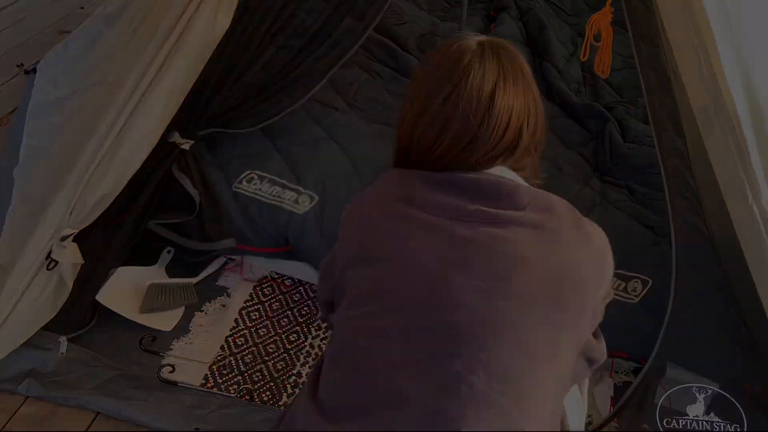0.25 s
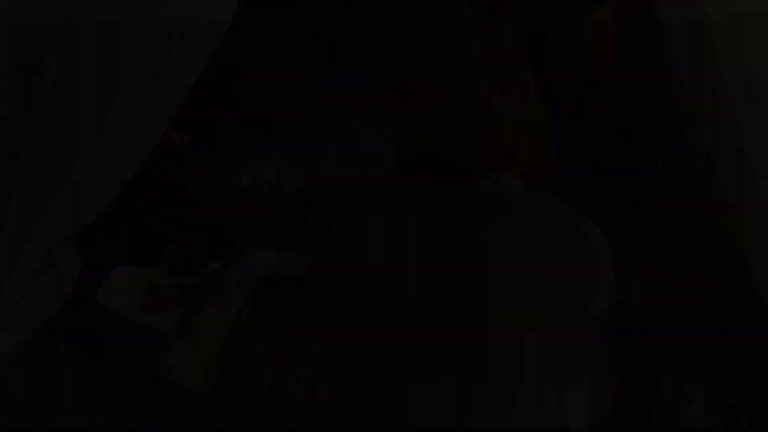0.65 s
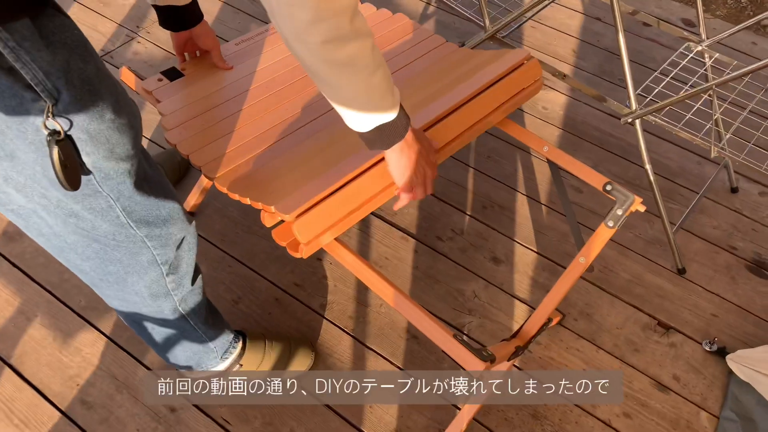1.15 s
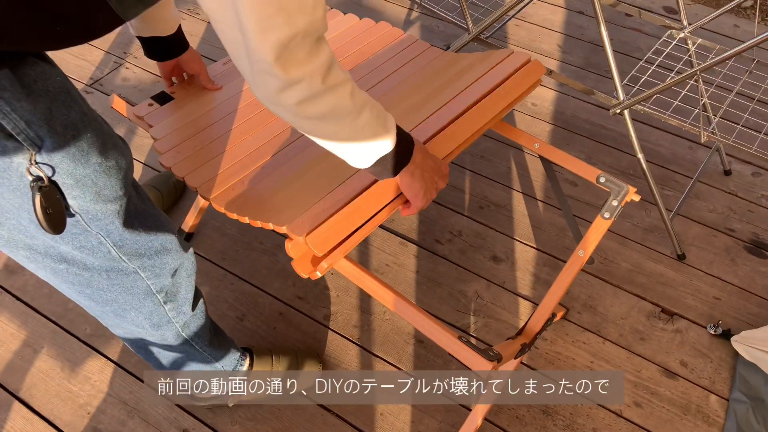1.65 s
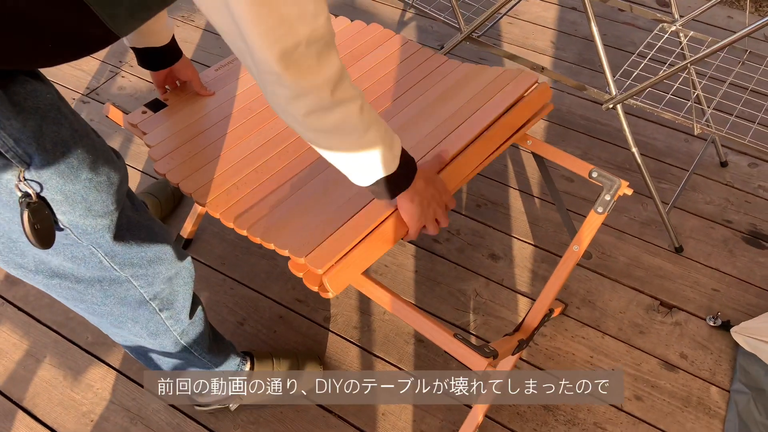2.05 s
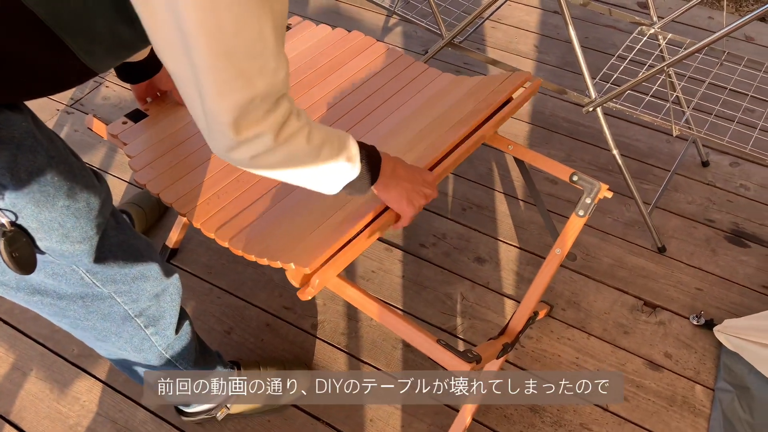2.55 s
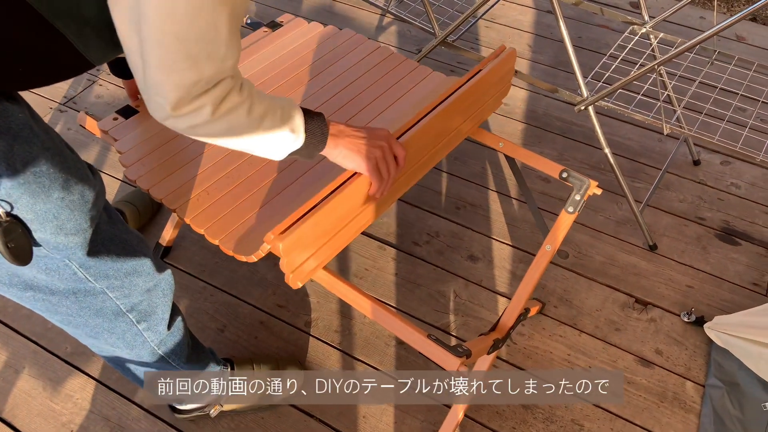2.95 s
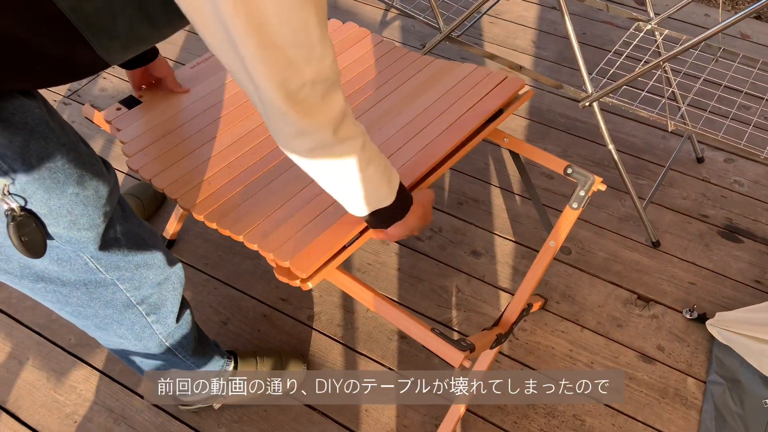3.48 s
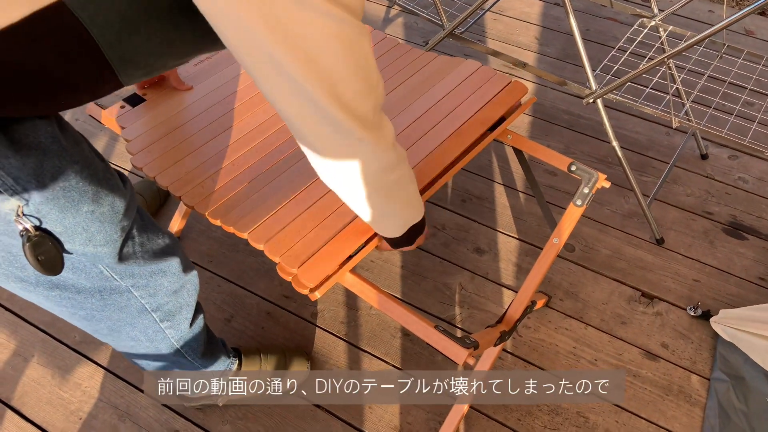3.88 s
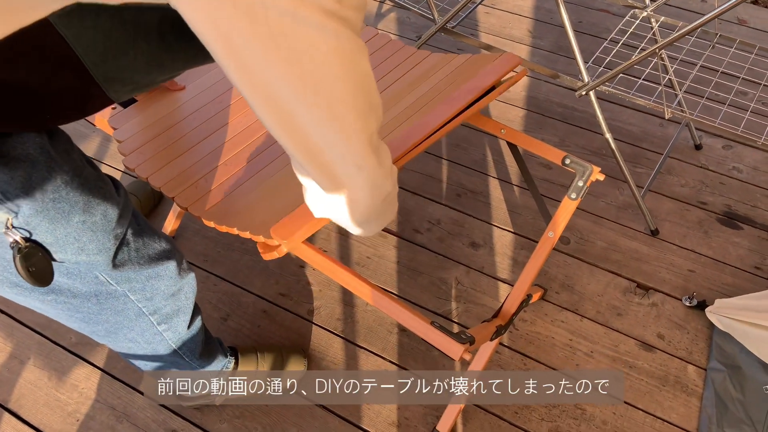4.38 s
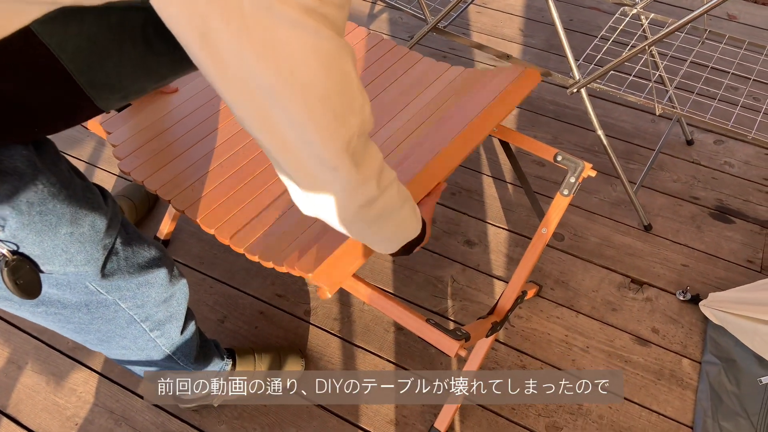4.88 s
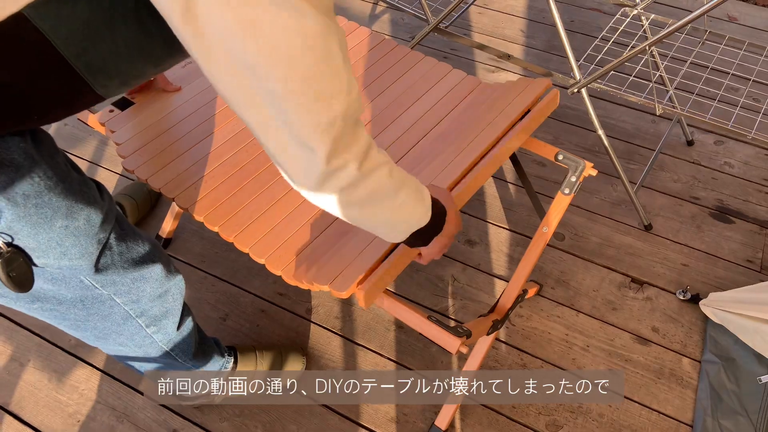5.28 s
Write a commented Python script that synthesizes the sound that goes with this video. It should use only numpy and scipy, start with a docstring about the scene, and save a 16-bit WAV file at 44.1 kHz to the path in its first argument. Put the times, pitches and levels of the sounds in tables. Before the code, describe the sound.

Very quiet cloth rustle and soft pats in a tent fade away within the first second. Abruptly the open deck begins with a bright wooden clack. Slats then scrape, rattle and knock in irregular bursts, with hand swishes between them and a tiny creak before three seconds. The loudest, brightest crack comes near five seconds. Close stereo microphone, dry outdoors, low wind buffeting.

```python
"""The slatted top of a wooden camp table is unrolled over its frame on an open deck. Slats clack as decaying
modes under a noise crack; sliding wood is friction noise and ringing jolts, with swishes, knocks and a creak.
A light breeze buffets the microphone: filtered noise swelling in gusts, and short pushes of pressure.
Before that, bedding rustles faintly in a tent and fades away: friction noise, soft pats and still air."""
import sys
import numpy as np
from scipy import signal
from scipy.fft import rfft, irfft, next_fast_len
from scipy.io import wavfile

SR = 44100
rng = np.random.default_rng(int(sys.argv[2]) if len(sys.argv) > 2 else 0)


def put_to_file(sound):
    """Save the sound as 16-bit audio at rate SR, in the file named by the first command-line argument."""
    columns = np.atleast_2d(sound).T  # one column per channel
    safe = np.clip(columns, -1, 1)
    whole_steps = np.round(safe * 32767)
    wavfile.write(sys.argv[1], SR, whole_steps.astype(np.int16))


N = 243873
TIME = np.arange(N) / SR
HIT = np.arange(SR // 4) / SR  # time within one short sound [s]

# short wooden bursts: the first row is the scene change, a burst as the deck sound begins; the rest are slat blows
# (time [s], relative level [dB], relative hardness of the contact [dB], own note [Hz])
WOOD_BURSTS = [(0.887, -44.5, -13.5, 1397), (0.917, -43.5, -13, 1300), (0.9391, -25.5, -17, 1360),
               (0.945, -28, -13, 1257), (0.9597, -26, -23, 1174), (0.978, -12.5, -5.5, 1265),
               (0.981, -23, -11, 3075), (1.0348, -34, -14, 2450), (1.4209, -53.5, -15.5, 1260),
               (1.7506, -21.5, -7, 1295), (1.7639, -27, -13, 1485), (1.798, -27, -19.5, 1300),
               (1.8572, -38.5, -28.5, 1440), (2.114, -51.5, -49.5, 1750), (2.2579, -48.5, -54.5, 1317),
               (2.316, -44, -56, 1454), (2.538, -51, -36.5, 1090), (2.636, -58, -21, 1274),
               (2.755, -43, -30, 1795), (2.7904, -28.5, -14, 1440), (2.8595, -40.5, -13, 890),
               (2.9047, -23.5, -8, 973), (2.9125, -22.5, -19.5, 3407), (3.189, -46, -33.5, 823),
               (3.233, -40.5, -20.5, 1124), (3.3238, -44.5, -48, 1950), (3.565, -51.5, -33, 858),
               (3.8058, -38.5, -32.5, 908), (3.9434, -41, -28, 1687), (4.043, -52.5, -44, 1407),
               (4.165, -41, -9, 1288), (4.2173, -36, -17, 895), (4.2362, -22.5, -24, 2322),
               (4.485, -46.5, -38.5, 1300), (4.5469, -33, -24.5, 1415), (4.559, -28.5, -24, 1282),
               (4.766, -35, -20.5, 2384), (4.802, -19, -0.5, 2290), (4.8143, -27, -4, 2300),
               (4.8695, -33, -24, 2145), (4.8966, -12.5, 7.5, 5640), (4.9338, -29.5, -15, 1685),
               (4.976, -35.5, -9.5, 874), (5.0128, -25, -7.5, 1760), (5.03, -23.5, -18, 2065),
               (5.4272, -33, -23, 1248), (5.437, -27.5, -18.5, 963), (5.4905, -35, -23, 1360)]
# what the slats and rails ring with: (frequency [Hz], relative level [dB])
WOOD_MODES = [(660, -3.5), (860, 1.5), (1040, -5.5), (1310, 3.5), (1450, 1.5), (1680, -2.5), (2335, 6),
              (2500, 1), (2790, -2), (3090, -1), (3480, -3), (3895, 2.5), (4420, 2.5), (4690, -2),
              (5565, -3), (5765, 0), (6480, 8), (6600, 3.5), (7450, 4)]
# colour of scraping friction: (frequency [Hz], gain [dB])
SCRAPE_COLOUR = [(300, -4.5), (1500, 4), (2500, -2.5), (4200, -4), (7000, -14.5), (8600, -26), (11000, -15),
                 (16000, -44.5)]
MIDDLING_HARD_DB = -18.5  # hardness of a middling blow
DRAG_T60_S = 0.036  # ring of the hand-damped top


def undb(db):
    """Decibels to gain."""
    return 10 ** (np.asarray(db) / 20)


def curve(rows, axis):
    """One column of a control table, at every sample."""
    rows = np.asarray(rows)
    return np.interp(TIME, rows[:, 0], rows[:, axis])


def unit(x):
    """Scale to rms 1."""
    return x / np.sqrt(np.mean(x ** 2))


def attack_rms(x, size=660):
    """Strength of the first moments of a blow."""
    return np.sqrt(np.mean(x[..., :size] ** 2))


def fade(t60):
    """Exponential ring-down that loses 60 dB in t60 seconds."""
    return np.exp(-np.log(1000) * HIT / np.maximum(t60, 1e-3))


def swell(s, db, length_s):
    """Power of a bell-shaped rise and fall around time s."""
    return undb(db) ** 2 * np.exp(-(2 * (TIME - s) / length_s) ** 2)


def colour(x, points):
    """Causal minimum-phase filter whose gain follows (Hz, dB) points."""
    size = 2 * next_fast_len(x.shape[-1])
    hz, db = np.transpose(points)
    freq = np.maximum(np.fft.rfftfreq(size, 1 / SR), 1)
    gain_db = np.interp(np.log(freq), np.log(hz), db)
    # folding the cepstrum onto positive time makes the filter causal
    cepstrum = irfft(np.log(undb(gain_db)))
    cepstrum[1:size // 2] *= 2
    cepstrum[size // 2 + 1:] = 0
    response = np.exp(rfft(cepstrum))
    return irfft(rfft(x, size) * response)[..., :x.shape[-1]]


def band(x, lo_hz, hi_hz):
    """Band-pass filter."""
    edges = [lo_hz, min(hi_hz, SR / 2 - 1)]
    return signal.sosfilt(signal.butter(3, edges, "band", fs=SR, output="sos"), x)


def stereo(pair, side_db):
    """Left and right from a middle signal and a side signal."""
    return pair[0] + undb(side_db) * pair[1] * np.array([[1], [-1]])


def noise(points, side_db):
    """Steady coloured stereo noise, rms 1."""
    return unit(colour(stereo(rng.standard_normal((2, N)), side_db), points))


def add(out, s, sound):
    """Mix a sound in at time s."""
    start = max(int(s * SR), 0)
    out[:, start:start + sound.shape[1]] += sound[:, :N - start]


def push(hz, cycles, side_db):
    """A short dull push of pressure: two waves under an envelope that peaks at 1 after the given cycles."""
    turn = HIT * hz
    envelope = turn / cycles * np.exp(1 - turn / cycles)
    waves = envelope * np.array([np.sin(2 * np.pi * turn), np.cos(2 * np.pi * turn)])
    return stereo(waves * rng.choice([-1, 1], (2, 1)), side_db)


def ring(hz, db, t60, spread):
    """Decaying modes; each reaches the two microphones with its own phase."""
    phase = rng.uniform(0, 2 * np.pi, (len(hz), 1)) + spread * rng.standard_normal((2, len(hz), 1))
    waves = np.sin(2 * np.pi * np.outer(hz, HIT) + phase)
    modes = (undb(db)[:, None] * waves).sum(axis=1) * fade(t60)
    return modes / attack_rms(modes)


def patchy(x, count=9):
    """Let every half octave swell and sink by itself, as the contact moves over the grain."""
    depth_db = 2.5
    edges = np.geomspace(600, 13000, count + 1)
    spectrum = rfft(x)
    part = np.digitize(np.fft.rfftfreq(N, 1 / SR), edges)
    total = 0
    for k in range(count + 2):
        walk = unit(band(rng.standard_normal(N), 4.2, 18))
        total = total + irfft(spectrum * (part == k), N) * undb(depth_db * walk)
    return unit(total)


def rub(grain_db, catch_db):
    """Friction: dense tiny slips that catch and let go."""
    slips = rng.standard_normal((2, N)) * undb(grain_db * rng.exponential(size=N))
    catch = unit(band(rng.standard_normal(N), 3.2, 60))
    return unit(colour(stereo(slips, -2.5) * undb(catch_db * catch), SCRAPE_COLOUR))


def tent():
    """Still air, rustling cloth and a few pats on the bedding, all fading away."""
    # colour of the still air: (frequency [Hz], gain [dB])
    air_colour = [(25, -18), (55, -5), (90, 1), (150, -5.5), (600, -16), (5000, -81)]
    # strokes over the cloth: (time [s], level [dB], length [s])
    cloth_strokes = [(0.147, -75.5, 0.22), (0.237, -65, 0.05), (0.334, -71.5, 0.064), (0.55, -83, 0.37),
                     (0.613, -77, 0.0097), (0.802, -81, 0.012)]
    # soft pats on the bedding: (time [s], relative level [dB], pitch [Hz])
    bedding_pats = [(0.169, -47.5, 126), (0.343, -51.5, 207), (0.684, -55, 251)]
    air_db = np.interp(TIME, [0, .25, .85], [-66, -64, -85])
    air = noise(air_colour, side_db=-9.5) * undb(air_db)
    cloth = patchy(rub(grain_db=2.5, catch_db=1.5))
    out = air + cloth * np.sqrt(sum(swell(*stroke) for stroke in cloth_strokes))
    for s, db, hz in bedding_pats:
        add(out, s - .002, undb(db + 0.5) * push(hz, cycles=0.45, side_db=-22))
    return out


def breeze():
    """Slow eddies rumble; gusts shed smaller ones that flutter higher up."""
    # colours of the wind on the microphone: (frequency [Hz], gain [dB])
    rumble_colour = [(20, -43), (35, -8), (58, 2.5), (80, 1.5), (125, -6), (180, -12.5), (300, -29),
                     (4000, -120)]
    flutter_colour = [(70, -27), (140, 2), (230, 8), (330, -3.5), (480, -9.5), (750, -22.5), (5000, -100)]
    # gusts: (time of the height [s], relative level [dB], length [s], flutter re gust level [dB])
    gust_swells = [(1.034, -49, 0.28, -5.5), (1.725, -45, 0.21, -6), (1.867, -35.5, 0.16, -15),
                   (2.566, -44.5, 0.54, -11.5), (2.954, -47.5, 0.46, -6.5), (3.343, -39, 0.14, -19),
                   (3.636, -34, 0.12, -1), (3.95, -46, 0.62, -20), (4.594, -37, 0.2, -12),
                   (5.035, -41, 0.16, -6), (5.221, -37, 0.046, -14), (5.425, -44, 0.21, -8)]
    calm_db = -59  # between the gusts, on the same scale as their levels
    gust_power = sum(swell(s, db, length) for s, db, length, _ in gust_swells)
    wind = np.sqrt(undb(calm_db) ** 2 + gust_power)
    shed = np.sqrt(sum(swell(s, db + flutter_db, length) for s, db, length, flutter_db in gust_swells))
    rumble = noise(rumble_colour, side_db=-16.0) * undb(1.8)
    eddies = unit(band(rng.standard_normal(N), 5.5, 33))
    flutter = unit(noise(flutter_colour, side_db=-5.5) * undb(7.5 * eddies))
    return rumble * wind + flutter * shed


def bumps():
    """Each eddy bumps the microphone: a slow push with a quick kink at its front, sharper in strong ones."""
    # single eddies: (time [s], relative level [dB], pitch [Hz])
    eddy_bumps = [(0.889, -36.5, 65), (1.065, -33, 110), (1.855, -32, 56), (1.927, -32.5, 158.5),
                  (2.373, -36.5, 157), (2.467, -36, 131), (2.489, -30, 208), (2.705, -33.5, 144),
                  (3.264, -32, 147), (3.572, -27.5, 152.2), (3.61, -25.5, 95), (3.63, -28.5, 260),
                  (3.661, -29, 130), (3.715, -36.5, 450), (3.718, -25, 90), (3.788, -29.5, 127.5),
                  (4.457, -33, 136), (4.483, -28, 133), (4.582, -27.5, 150), (4.647, -32.5, 150),
                  (5.128, -33, 123.2), (5.196, -31, 129)]
    full_eddy_db = -24.5
    out = np.zeros((2, N))
    for s, db, hz in eddy_bumps:
        strength_db = db - full_eddy_db
        # the kink grows and rises in pitch with the strength of the eddy
        kink_db = -7 + 0.37 * strength_db
        kink_hz = 305 + 12 * strength_db
        add(out, s - .002, undb(db + 2.0) * push(hz, cycles=0.41, side_db=-27.5))
        add(out, s + 0.00011, undb(db + kink_db) * push(kink_hz, cycles=0.65, side_db=-5.5))
    return out


def width(lows):
    """The low sounds sit near the centre, then open out close to the strongest gust."""
    wide_from_s, centred_side_db = 3.54, -36
    side_db = np.interp(TIME, [wide_from_s - .03, wide_from_s], [centred_side_db, 0])
    return stereo([(lows[0] + lows[1]) / 2, (lows[0] - lows[1]) / 2], side_db)


def shaking(t60):
    """How hard the table is shaking: it swells from just before each burst and dies away."""
    power = np.zeros((1, N))
    build_up = 1 - np.exp(-HIT / 0.0087)
    for s, db, hard_db, *_ in WOOD_BURSTS:
        # a hard, brief contact shakes the table less
        shove = undb(db - 0.26 * max(hard_db - MIDDLING_HARD_DB, 0))
        add(power, s - .009, (shove * fade(t60) * build_up)[None] ** 2)
    return np.sqrt(power[0])


def frame():
    """The frame under the slats thuds dully around each blow: low noise that follows the shaking."""
    # colour of the thud: (frequency [Hz], gain [dB])
    thud_colour = [(60, -14), (150, -6), (300, -0.5), (480, -10.5), (800, -16.5), (4000, -79)]
    thud_db, thud_t60_s = -15.5, 0.22  # level re the shaking, decay
    return noise(thud_colour, side_db=-12.0) * undb(thud_db) * shaking(thud_t60_s)


def tick():
    """A dry click: a very short noise burst."""
    tick_s, tick_db, tick_t60_s = 1.9265, -48.5, 0.0071
    out = np.zeros((2, N))
    burst = noise(SCRAPE_COLOUR, side_db=-24.0)[:, :len(HIT)] * fade(tick_t60_s)
    add(out, tick_s, undb(tick_db) * burst)
    return out


def knocks():
    """The hand presses on the top: soft pushes ring the low modes of the frame."""
    # knocks: (time [s], level [dB])
    frame_knocks = [(1.063, -45.5), (1.425, -58), (1.614, -51), (1.706, -53), (2.462, -47), (5.344, -56),
                    (5.435, -47)]
    # what the frame rings with: (frequency [Hz], relative level [dB])
    frame_rings = [(265, 4), (360, -1), (425, 0.5), (530, -1)]
    knock_t60_s, knock_rise_s = 0.18, 0.00039
    out = np.zeros((2, N))
    hz, db = np.transpose(frame_rings)
    for s, level_db in frame_knocks:
        spot = 2 * rng.standard_normal(len(hz))
        wood = ring(hz, db + spot, knock_t60_s, spread=0.093)
        add(out, s, undb(level_db) * wood * (1 - np.exp(-HIT / knock_rise_s)))
    return out


def creak():
    """Wood sticks and slips at a mostly rising rate as the end slat tips; only the lowest harmonics get out."""
    # the creak: (time [s], slip rate [Hz], level [dB])
    slip_path = [(2.765, 222, -42.5), (2.80, 282.5, -54), (2.825, 275, -37.5), (2.855, 376, -58)]
    phase = 2 * np.pi * np.cumsum(curve(slip_path, axis=1)) / SR
    tone = unit(np.sin(phase) + undb(-12.5) * np.sin(2 * phase))
    during = (TIME > slip_path[0][0]) * (TIME < slip_path[-1][0])
    return tone * undb(curve(slip_path, axis=2)) * during


def swishes():
    """A hand slides along the slats: a soft resonance over broad grainy friction, catching and fading."""
    # swishes: (start [s], length [s], starting level [dB], first pitch [Hz], last pitch [Hz])
    hand_slides = [(1.052, 0.34, -64, 1463, 1682), (3.22, 0.51, -64, 1837, 1679),
                   (5.06, 0.15, -77.5, 1580, 2060)]
    half_width_hz, attack_s, release_s, sag_db_per_s = 370, 0.0079, 0.04, 23.5
    grain_level_db = -1.5  # broad friction re the resonance
    out = np.zeros((2, N))
    grain = rub(grain_db=0.5, catch_db=-1)
    for s, length, db, first_hz, last_hz in hand_slides:
        t = np.arange(int(length * SR)) / SR
        # slow noise on a gliding carrier makes a moving resonance
        friction = band(rng.standard_normal((2, 2, SR)), 15, half_width_hz)[..., :len(t)]
        phase = 2 * np.pi * np.cumsum(np.linspace(first_hz, last_hz, len(t))) / SR
        swish = unit(stereo(friction[0] * np.cos(phase) + friction[1] * np.sin(phase), side_db=-22))
        swish = swish + undb(grain_level_db) * grain[:, :len(t)]
        envelope = np.minimum(t / attack_s, 1) * np.minimum((length - t) / release_s, 1)
        catch = undb(2.5 * unit(band(rng.standard_normal(SR), 8, 120))[:len(t)])
        add(out, s, swish * catch * envelope * undb(db - sag_db_per_s * t))
    return out


def judder(jolts, note_hz, note_t60):
    """Tiny jolts ring the hand-damped top, its modes uneven from spot to spot, and the rubbed slat's note."""
    hz, db = np.transpose(WOOD_MODES)
    top = ring(hz, db + 4 * rng.standard_normal(len(hz)), DRAG_T60_S, spread=0.91)
    top = colour(top, [(600, 3.5), (1900, 0.5), (2400, -5.5), (6000, -20.5)])
    own = ring(np.array([note_hz]), np.zeros(1), note_t60, spread=0.27)
    response = top / attack_rms(top) + undb(-3.5) * own
    return unit(signal.oaconvolve(jolts[None], response, axes=1)[:, :N])


def sliding():
    """Slats drag over the rails and jostle around each blow: friction hisses, and tiny jolts ring the wood."""
    # pulls that drag the top over the rails:
    # (time of fastest travel [s], level [dB], length [s], relative hiss level [dB], note of the rubbed slat [Hz])
    rail_drags = [(1.696, -60, 0.24, -3, 1230), (2.215, -67, 0.035, -7, 2358),
                  (2.449, -64.5, 0.19, -4, 1336), (2.484, -64, 0.066, 1, 6910),
                  (2.888, -49, 0.078, -7.5, 1100), (3.18, -61.5, 0.16, -2.5, 875),
                  (4.249, -63.5, 0.27, -5, 1341), (4.924, -51.5, 0.2, -1.5, 527.4)]
    rest_db = -76  # the top never lies quite still; raised with the hiss below
    jostle_db, jostle_t60_s = -15, 0.14  # level re the shaking, decay
    jolts_per_s = 200
    sing_t60_s = 0.071  # a rubbed slat sings on at its own note
    hiss = patchy(rub(grain_db=1.5, catch_db=0.5)) * undb(2.0)
    jolts = patchy((rng.random(N) < jolts_per_s / SR) * rng.standard_normal(N))
    # swells from just before each blow and dies away
    jostle = undb(jostle_db) * shaking(jostle_t60_s)
    wood = judder(jolts, note_hz=1304, note_t60=DRAG_T60_S) * jostle
    hiss_power = undb(rest_db) ** 2 + jostle ** 2
    for s, db, length, hiss_db, note_hz in rail_drags:
        wood = wood + judder(jolts, note_hz, sing_t60_s) * np.sqrt(swell(s, db, length))
        hiss_power = hiss_power + swell(s, db + hiss_db, length)
    return hiss * np.sqrt(hiss_power) + wood


def clack(body_db, edge_db, note_hz):
    """One slat lands: a crack, the modes of the whole top, and the struck slat's own note."""
    # colour of the crack of wood on wood: (frequency [Hz], gain [dB])
    crack_colour = [(150, -4.5), (300, -2), (500, -10.5), (800, -8), (1300, -2.5), (3500, -8), (5000, -6),
                    (7400, -10), (8600, -24.5), (11000, -15.5), (13200, -30), (16500, -38)]
    slat_t60_s, crack_t60_s = 0.081, 0.057  # the modes outlast the main crack
    rise_s, softest_rise_s = 0.00027, 0.0025  # build-up at 0 dB hardness, and the longest allowed
    hz, db = np.transpose(WOOD_MODES)
    # every slat is cut a little differently and is struck at another spot
    detune, spot = rng.standard_normal((2, len(hz)))
    top = ring(hz * (1 + 0.007 * detune), db + 4 * spot, slat_t60_s, spread=0.93)
    # the dense upper modes die with the slat and the surroundings answer faintly
    decay = fade(crack_t60_s) + undb(-31.5) * fade(0.27)
    mid, side = rng.standard_normal((2, len(HIT))) * decay
    # the faces chatter together in many tiny separate contacts
    chatter = undb(4.5 * unit(band(rng.standard_normal(len(HIT)), 120, 800)))
    # the lows reach both microphones alike
    crack = colour(stereo([mid, band(side, 1000, 13000)], side_db=-0.5) * chatter, crack_colour)
    # the slat bounces within a few milliseconds, which combs its spectrum
    bounce = int(SR * rng.uniform(.0011, .004))
    crack = crack + np.pad(crack, ((0, 0), (bounce, 0)))[:, :-bounce]
    own = ring(np.array([note_hz]), np.zeros(1), slat_t60_s, spread=0.89)
    wood = crack / attack_rms(crack) + undb(-1.5) * top + undb(-5.0) * own
    # a hard contact is sudden and bright, a soft one builds slowly and leaves mostly the body
    build_up_s = min(rise_s * undb(-edge_db / 2), softest_rise_s)
    wood = wood * (1 - np.exp(-HIT / build_up_s))
    bands_hz = [(1000, 12000), (400, 1100), (4500, 12000)]
    whole, body, edge = (20 * np.log10(attack_rms(band(wood, *limits))) for limits in bands_hz)
    warmth_db = body_db - body + whole
    bright_db = edge_db - edge + whole
    wood = colour(wood, [(850, warmth_db + 7.0), (1300, 0.0031), (2200, 0),
                         (3600, 0.5 * bright_db + 7.5), (5400, bright_db + 0.5)])
    return wood / attack_rms(band(wood, 1000, 12000))


def rebound(wood, count=2):
    """Repeat a blow at uneven gaps, weaker each time."""
    usual_gap_s, step_db = 0.008, -5.5
    gaps_s = usual_gap_s * rng.uniform(.5, 1.5, count)
    lags = (SR * np.cumsum(gaps_s)).astype(int) + 1
    out = wood
    for k, lag in enumerate(lags):
        # the first rebound already lies three steps down
        later = np.pad(wood, ((0, 0), (lag, 0)))[:, :len(HIT)]
        out = out + undb(step_db * (k + 3.0)) * later
    return out


def slats():
    """All wooden bursts: each has a faint copy just before it, then rebounds; light ones sound hollow."""
    middling_db = -31.5
    lead_s, lead_db = 0.005, -13.5  # the faint copy: longest lead, level re the blow
    out = np.zeros((2, N))
    for s, db, hard_db, note_hz in WOOD_BURSTS:
        # the share of hollow body shrinks as blows get stronger and grows with hardness
        body_db = -16 - 0.33 * (db - middling_db) + 0.11 * (hard_db - MIDDLING_HARD_DB)
        wood = undb(db - 7.5) * clack(body_db, hard_db, note_hz)
        add(out, s - lead_s * rng.uniform(.5, 1), undb(lead_db) * wood)
        add(out, s, rebound(wood))
    return out


def ports(pair):
    """The table stands a little to the right: its sound reaches the left microphone later, coloured otherwise."""
    # how the table's sound is shared: (frequency [Hz], left minus right [dB])
    balance = [(700, -1), (1200, 3), (2500, 0), (5000, -3), (8000, 0)]
    hz, db = np.transpose(balance)
    left = colour(pair[0], np.column_stack([hz, db / 2]))
    right = colour(pair[1], np.column_stack([hz, -db / 2]))
    return np.array([np.roll(left, 2), right])  # left is two samples late


def scene():
    """First the tent, then the table on the deck."""
    deck_start_s = 0.885
    table = ports(slats() + sliding() + swishes() + knocks() + tick())
    deck = table + creak() + width(frame() + breeze() + bumps())
    outside = np.clip((TIME - deck_start_s) / .004, 0, 1)
    return (1 - outside) * tent() + outside * deck


def record(dry):
    """The recorder thins the deepest rumble and cuts the top."""
    low_cut_hz, top_hz = 16, 15900
    thinned = signal.sosfilt(signal.butter(2, low_cut_hz, "high", fs=SR, output="sos"), dry)
    return signal.sosfilt(signal.ellip(8, .2, 70, top_hz, fs=SR, output="sos"), thinned)


dry = scene()
out = record(dry)
put_to_file(out)
```